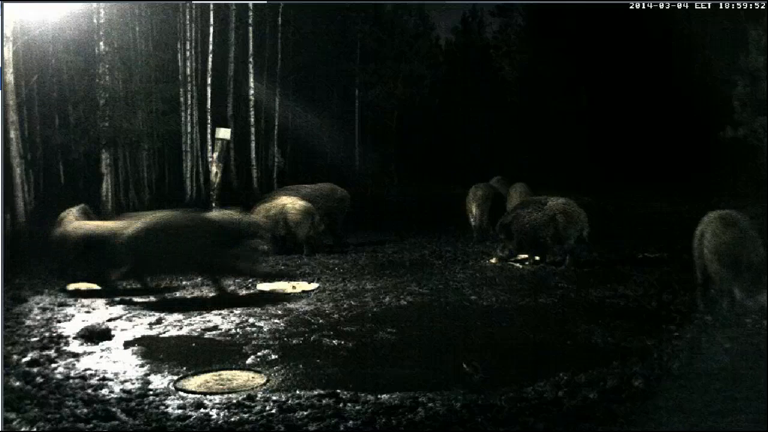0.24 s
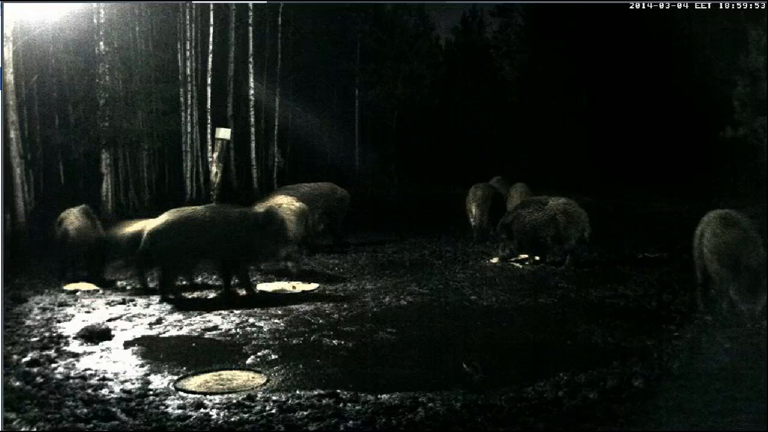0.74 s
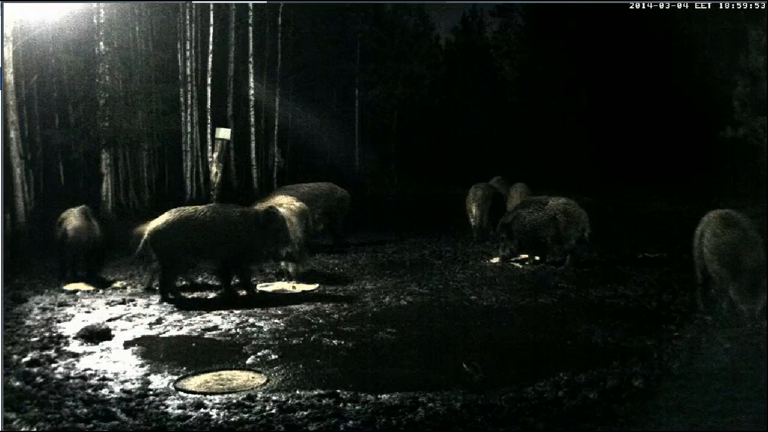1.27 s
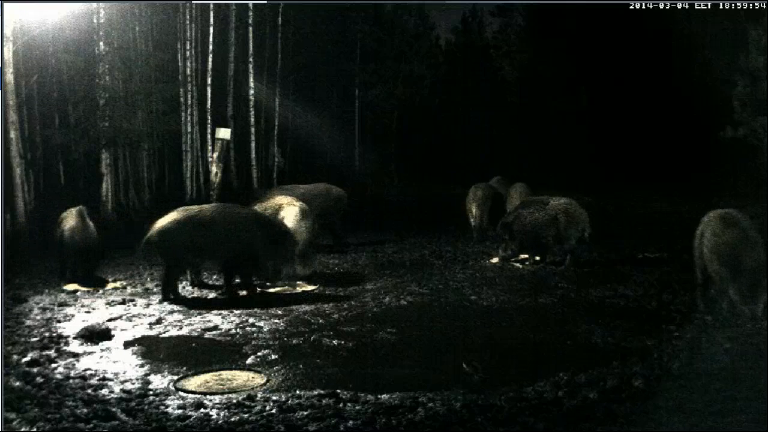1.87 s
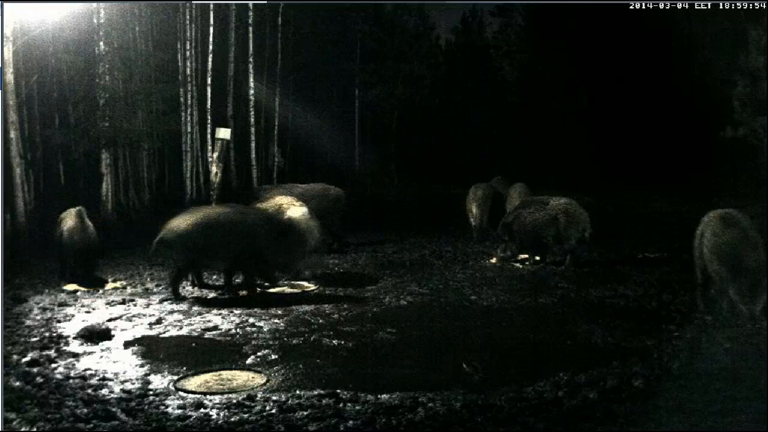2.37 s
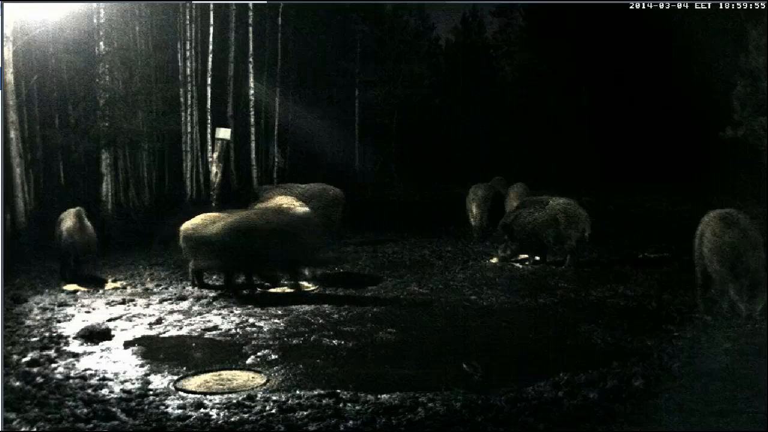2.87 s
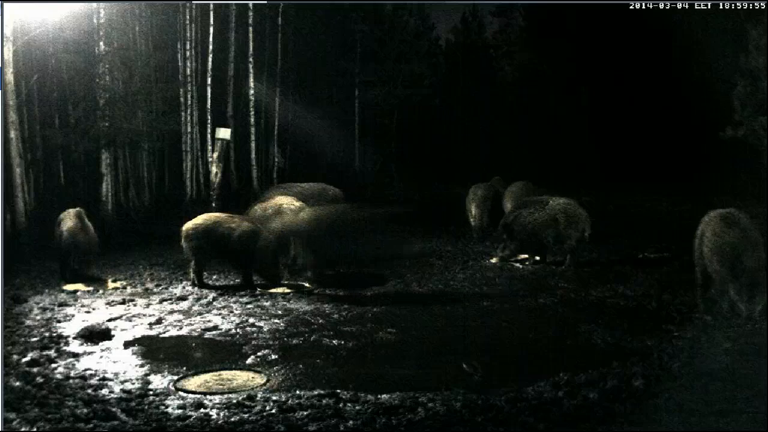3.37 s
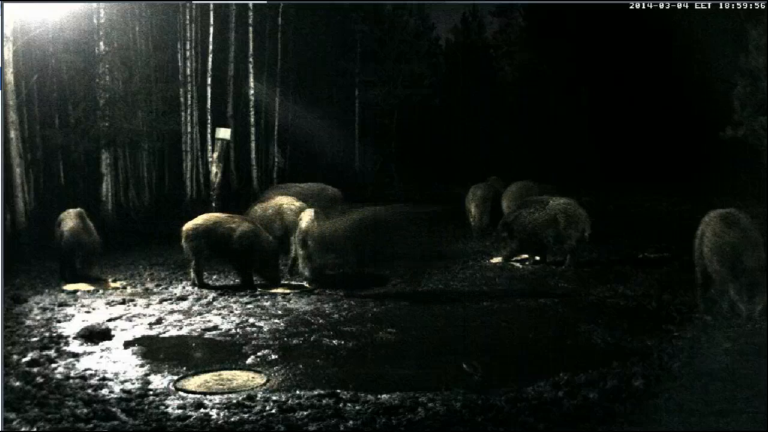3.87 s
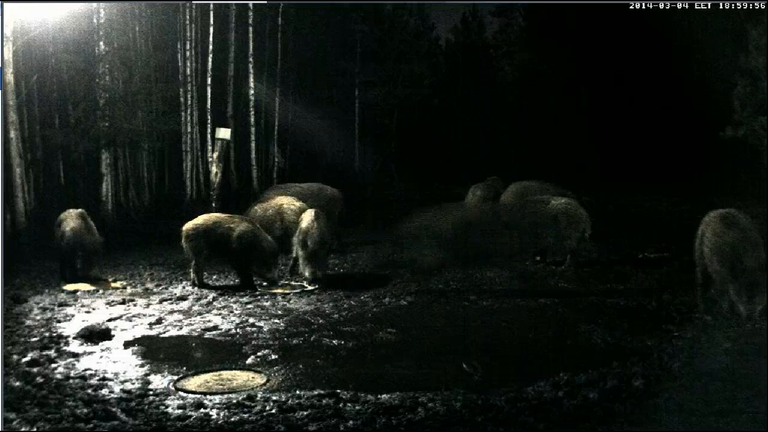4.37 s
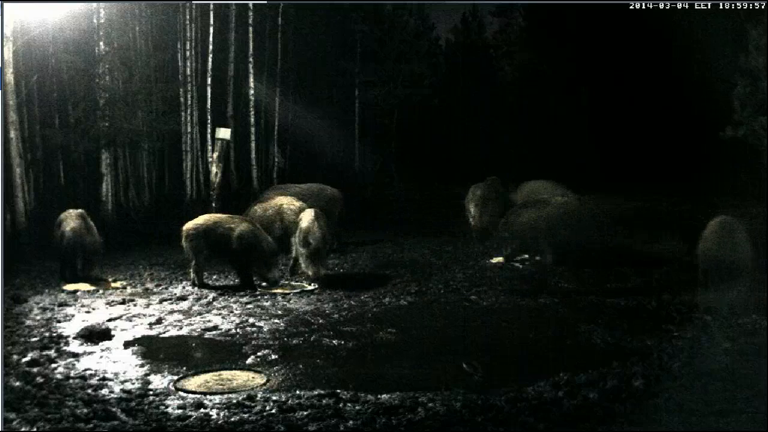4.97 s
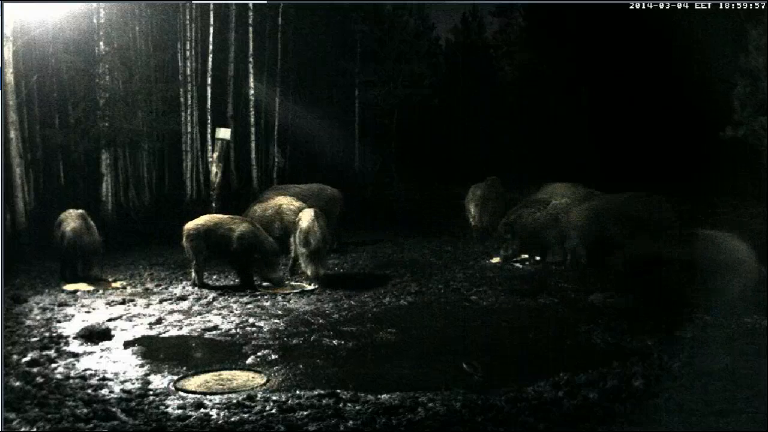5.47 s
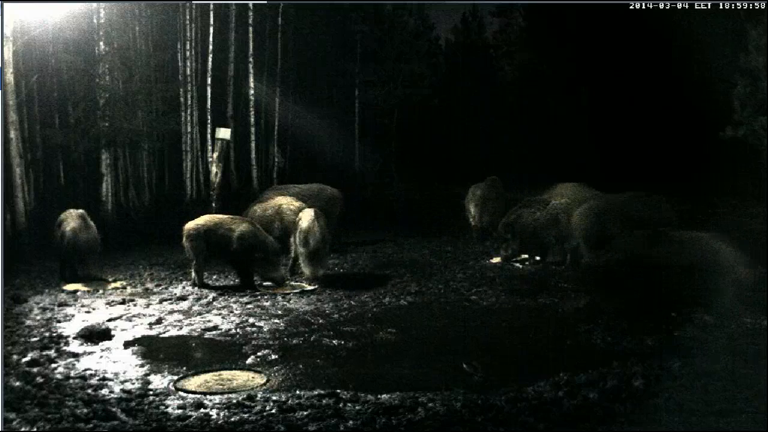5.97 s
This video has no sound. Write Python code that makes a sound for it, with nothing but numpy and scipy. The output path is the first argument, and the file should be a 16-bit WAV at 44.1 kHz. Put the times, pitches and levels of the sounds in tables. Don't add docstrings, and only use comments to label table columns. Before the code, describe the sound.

A herd of wild boar feeds on wet ground at a forest edge at night. Dense irregular crunching, husk cracks, sharp kernel snaps and tiny clicks run throughout over constant jaw grinding. A distant engine hums low and steady, sinking slightly. Soft mud thumps and wet smacks come between, and near the end one animal gives a quick low grunt. The narrow-band microphone sounds boxy and slightly gritty.

```python
import sys
import numpy as np
from scipy import signal
from scipy.fft import rfft, irfft
from scipy.io import wavfile
from scipy.ndimage import uniform_filter1d

SR = 44100
rng = np.random.default_rng(int(sys.argv[2]) if len(sys.argv) > 2 else 0)


def magnitude_from_level(level_db):
    exponent = np.asarray(level_db, float) / 20
    return 10 ** exponent


def store_pcm(level_fs):
    pcm = np.round(np.clip(level_fs, -1, 1) * 32767).astype(np.int16)
    wavfile.write(sys.argv[1], SR, np.atleast_2d(pcm).T)


N = 274302


def in_time(rows):
    s, *columns = np.transpose(rows)
    return [np.interp(np.arange(N) / SR, s, c) for c in columns]


def rms_one(x):
    return x / np.sqrt(np.mean(x ** 2) + 1e-20)


def highpass(x, order, hz):
    return signal.sosfilt(signal.butter(order, hz, "high", fs=SR, output="sos"), x)


def drift(rate):
    r = np.exp(-80 * np.pi * rate / SR)
    noise = rng.standard_normal(N // 40 + 2002)
    slow = signal.lfilter([1], [1, -2 * r, r * r], noise)[2000:]
    return np.interp(np.arange(N) / 40, np.arange(len(slow)), rms_one(slow))


def ring(clicks, hz, t60):
    r, w = magnitude_from_level(-60 / (t60 * SR)), 2 * np.pi * hz / SR
    return signal.lfilter([0, np.sin(w)], [1, -2 * r * np.cos(w), r * r], clicks + 1e-18)


def grains(shape, per_s, spread_db):
    born = rng.random(shape) < per_s / SR
    sizes = magnitude_from_level(spread_db * np.minimum(rng.exponential(1, shape), 3.3))
    return born * sizes * rng.choice([-1, 1], shape)


def coloured(spectrum):
    hz, level_db = np.transpose(spectrum)
    grid = np.arange(N // 2 + 1) * SR / N + 1
    gain = magnitude_from_level(np.interp(np.log(grid), np.log(hz), level_db))
    return rms_one(irfft(rfft(rng.standard_normal(N)) * gain, N))


def add(out, s, piece):
    at = max(round(s * SR), 0)
    out[at:at + len(piece)] += piece[:N - at]


def knock(s, peak_db, hz, cycles):
    t60 = np.clip(cycles, 1, 45) / hz
    pulse = np.arange(round(2 * t60 * SR)) == 0
    for share in (1, 0.4, 0.4):
        pulse = ring(pulse, hz, share * t60)
    return s - np.abs(pulse).argmax() / SR, magnitude_from_level(peak_db) * pulse / np.abs(pulse).max()


def knocks(rows):
    out = np.zeros(N)
    for row in rows:
        add(out, *knock(*row))
    return out


def pushes(rows):
    out = np.zeros(N)
    for s, peak_db, hz, cycles in rows:
        t60 = np.clip(cycles, 1, 45) / hz
        pulse = np.arange(round(2 * t60 * SR)) == 0
        pulse = ring(ring(pulse, hz, t60), hz, 0.12 * t60)
        add(out, s - 0.81 / hz, magnitude_from_level(peak_db) * pulse / np.abs(pulse).max())
    return out


def fractures(rows, size=500):
    out, t = np.zeros(N), np.arange(size) / SR
    for s, peak_db, hz, tick_db, cycles in rows:
        add(out, *knock(s, peak_db, hz, cycles))
        add(out, *knock(s, peak_db + tick_db + 0.5, 3350, 16.0))
        add(out, *knock(s - 0.00046, peak_db - 9.5, 2600, 6.0))
        bits = grains(size, per_s=3800, spread_db=5.0)
        splinter = rms_one(ring(bits, hz, 3.0 / hz)) * np.exp(-t / 0.0012)
        add(out, s, magnitude_from_level(peak_db - 15.0) * splinter)
    return out


def engine():
    # t/s, level/dB
    tone_level = [(0.0, -62), (1.0, -58), (1.19, -52), (1.61, -58.5), (1.9, -56.5), (1.97, -56),
                  (2.05, -53), (2.27, -53.5), (3.59, -54), (3.72, -57.5), (4.31, -50.5), (4.66, -53),
                  (4.87, -57), (5.33, -56), (5.51, -55), (6.06, -51), (6.22, -56)]
    # t/s, depth/dB, width/s
    half_fades = [(.55, 5.5, 0.1), (1.1, 3, 0.5), (1.9, 6, 0.42), (5.5, 4.5, 0.82)]
    # f/Hz, level/dB per Hz
    rumble_colour = [(100, -36.5), (128, -14.5), (148, -2), (200, 3), (260, -4), (340, -3.5), (440, -10),
                     (525, -14), (640, -17), (900, -17), (1500, -33.5)]
    blade_hz, sag_hz_per_s = 239.9, 2.31
    t, (tone_db,) = np.arange(N) / SR, in_time(tone_level)
    phase = 2 * np.pi * np.cumsum(blade_hz - sag_hz_per_s * t) / SR
    half_db = -64.5 - sum(depth_db * np.exp(-((t - s) / width) ** 2) for s, depth_db, width in half_fades)
    tone = magnitude_from_level(tone_db + 3 + 0.6 * drift(7)) * np.sin(phase + .12 * drift(3))
    half = magnitude_from_level(half_db + 3 + 1.8 * drift(4)) * np.sin(phase / 2)
    double = magnitude_from_level(tone_db - 16.5 + 3.0 * drift(6)) * np.sin(2 * phase + .8 * drift(5))
    rumble_db = -55.5 + 0.2 * (tone_db - tone_db.mean())
    rumble = magnitude_from_level(rumble_db + 1.37 * drift(15)) * coloured(rumble_colour)
    return tone + half + double + rumble


def grinding():
    # t/s, level/dB, dryness/dB (shifts weight from the dull to the bright part)
    herd = [(0.0, -61, -0.5), (0.31, -57.5, 1.5), (1.3, -60.5, 0), (2.27, -63.5, -1.5), (2.65, -59.5, -0.2),
            (3.27, -58.5, 2.5), (4.09, -56.5, -1), (4.68, -57.5, 0), (4.9, -55, 9), (5.44, -57, -1),
            (5.7, -59.5, 1), (6.22, -57.5, 0.5)]
    jaw, (herd_db, dry_db) = drift(32), in_time(herd)
    parts = [(herd_db, 1450, 2530),
             (herd_db - 7 - 3.8 * dry_db, 855, 1310),
             (herd_db - 0.5 + 0.16 * dry_db, 3530, 3580)]
    out = np.zeros(N)
    for level_db, low_hz, high_hz in parts:
        clicks, dealt = grains(N, per_s=2000, spread_db=2.5), rng.integers(0, 8, N)
        pitches = np.geomspace(low_hz, high_hz, 8)
        part = sum(ring(clicks * (dealt == k), hz, 9.5 / hz) for k, hz in enumerate(pitches))
        out += magnitude_from_level(level_db + 2.43 * jaw + 1.1 * drift(38)) * rms_one(part)
    return out


def crunches(size=9000):
    # t/s of peak, body level/dB, mouth f/Hz, bright level/dB
    cracks = [(.17, -42, 2420, -44), (0.458, -67, 2570, -48), (.618, -48, 2560, -46),
              (1.009, -57, 920, -79), (2.164, -44, 870, -52.5), (2.543, -40, 1730, -44),
              (2.742, -44, 1730, -50), (2.935, -44, 1290, -53), (2.975, -40.5, 1000, -50),
              (3.321, -48, 1200, -56), (3.413, -45, 920, -75), (3.543, -48, 1790, -49),
              (3.69, -43, 1790, -45), (4.139, -42, 1280, -53), (4.343, -38.5, 980, -48),
              (5.023, -56, 2060, -47), (5.07, -38, 2530, -51), (5.109, -43, 1750, -59),
              (5.277, -37.5, 1610, -45), (5.501, -41, 1100, -49), (5.536, -48, 1030, -41.5),
              (5.794, -45, 1320, -75), (5.949, -38.5, 1020, -43), (6.138, -58, 1940, -40),
              (.915, -39, 2060, -58), (5.156, -42.5, 2900, -57), (5.212, -59, 3300, -49)]
    chews = [(.008, -49, 2330, -45.5), (.31, -43.5, 2230, -73), (0.727, -46, 2400, -47),
             (1.345, -57, 1670, -65), (1.369, -51, 1540, -56), (1.457, -46, 1670, -61),
             (1.53, -44, 1240, -75), (1.715, -49, 1350, -51.5), (1.805, -41, 1490, -54),
             (2.782, -65, 2280, -55), (3.19, -38.5, 2100, -39), (3.353, -38.5, 1750, -47.5),
             (3.463, -46.5, 1670, -74), (3.505, -46.5, 1090, -76), (3.747, -39, 1260, -40.5),
             (3.767, -43, 1740, -53), (3.944, -39.5, 1640, -51), (4.434, -47.5, 1520, -48),
             (4.531, -38, 1840, -48.5), (4.721, -44, 1710, -54), (4.915, -42.5, 1700, -48),
             (5.298, -55, 1970, -50), (5.318, -41.5, 1740, -52), (5.613, -38, 1800, -44)]
    bites = [(0.287, -53, 1750, -60), (.361, -46, 1120, -52), (.428, -52, 2580, -48),
             (.897, -46, 880, -42.5), (1.07, -49, 1520, -53), (1.127, -41.5, 1720, -56),
             (1.181, -36, 1820, -46), (1.419, -43, 1800, -54), (1.64, -41.5, 1740, -55.5),
             (2.421, -47.5, 2340, -56), (3.593, -43, 1760, -46), (4.002, -46, 1930, -47.5),
             (4.479, -46, 2110, -51), (4.77, -44, 2080, -43), (4.8, -35.5, 2480, -51),
             (4.892, -54, 2900, -51), (4.936, -58, 3260, -47.5), (5.468, -49, 2400, -54),
             (5.19, -41.5, 1820, -59)]
    drags = [(.25, -52, 2040, -52), (.508, -71, 1680, -53.5), (.82, -49.5, 1700, -53),
             (1.857, -46.5, 1500, -53), (1.9, -47, 970, -57), (2.024, -45.5, 1430, -85),
             (2.359, -51, 1760, -54), (2.485, -52, 1820, -54), (2.608, -50, 930, -64),
             (2.831, -48.5, 1980, -50), (4.09, -52, 1530, -52.5), (4.161, -44, 1330, -50),
             (4.264, -49.5, 1640, -60)]
    # swell/s, fade/s
    closings = [
        (0.0082, 0.0054),
        (0.014, 0.0098),
        (0.0074, 0.013),
        (0.021, 0.023),
    ]
    out, t = np.zeros(N), np.arange(size) / SR - .08
    rows = [(*row, *closing) for kind, closing in zip((cracks, chews, bites, drags), closings) for row in kind]
    for s, body_db, hz, bright_db, swell, fade in rows:
        a, b, c = grains((3, size), per_s=2200, spread_db=3.0)
        rise = np.exp(-.7 * (np.minimum(t, 0) / max(swell, .002)) ** 2)
        shape = rise * np.exp(-.46 * (np.maximum(t, 0) / max(fade, .003)) ** 0.97)
        body = 0.5 * rms_one(ring(a, hz, 14.2 / hz)) + 0.36 * rms_one(ring(b, 1820, 0.005))
        bright = rms_one(ring(c, 3477, 0.0043))
        piece = shape * (magnitude_from_level(body_db) * body + magnitude_from_level(bright_db) * bright)
        before_start = max(round((-s - t[0]) * SR), 0)
        add(out, s + t[0], piece[before_start:])
    return out


def husks():
    # t/s of peak, level/dB, mouth f/Hz
    cracked = [(.009, -37.5, 3150), (0.4557, -32, 3270), (0.461, -31.5, 3310), (0.6133, -35.5, 3500),
               (0.898, -41, 3240), (1.7138, -36, 2950), (1.783, -40.5, 3340), (1.061, -44.5, 3350),
               (2.5034, -37.5, 3350), (3.252, -42, 2670), (2.8884, -36.5, 3450), (2.999, -34.5, 3505),
               (3.5877, -39, 2990), (3.608, -39, 2630), (3.708, -36, 2810), (3.7435, -29, 3360),
               (4.211, -38.5, 3290), (4.796, -32, 3350), (5.071, -37.5, 3150), (5.263, -37, 3030),
               (5.498, -33.5, 2840), (5.503, -31, 3440), (5.5314, -28.5, 3340), (5.6754, -46, 2480),
               (6.1343, -34.5, 2830), (6.1887, -38.5, 3350)]
    return fractures([(*row, -30, 21.0) for row in cracked])


def trunks(x):
    t = np.arange(round(.2 * SR)) / SR
    haze = rms_one(grains(len(t), per_s=4200, spread_db=-0.5)) * magnitude_from_level(-60 * t / 0.28) * (t > .006)
    return signal.fftconvolve(x, haze)[:N]


def splinters():
    # t/s of peak, level/dB, mouth f/Hz
    deep = [(0.0507, -48, 1370), (0.0582, -51, 1050), (0.1712, -54, 1430), (0.3074, -53.0, 1100),
            (0.3144, -48, 1250), (0.3663, -58, 1100), (0.4269, -49, 1220), (0.4553, -56, 1310),
            (0.6162, -52, 1310), (0.691, -52, 1310), (0.7082, -46.5, 1150), (0.7861, -52, 1370),
            (0.8986, -45, 920), (1.2064, -54, 930), (1.2243, -43, 1140), (1.232, -54, 1370),
            (1.3198, -50, 950), (1.4378, -51, 1420), (1.463, -48, 1020), (1.4852, -55.0, 1060),
            (1.8511, -50, 1020), (1.8586, -45, 840), (1.8659, -48, 1430), (1.8823, -49, 1430),
            (2.02, -43, 1490), (2.025, -49, 885), (2.1657, -47, 1370), (2.1744, -49, 1260),
            (2.3547, -46.5, 1140), (2.5296, -53.0, 1310), (2.6079, -54, 930), (2.7384, -52, 1490),
            (2.8808, -54.0, 1310), (2.9347, -47.0, 1270), (3.0841, -49, 1490), (3.2028, -48, 1200),
            (3.2377, -49, 1010), (3.3211, -42.5, 1200), (3.4273, -46, 1200), (3.4395, -46, 1190),
            (3.5026, -43, 1150), (3.6079, -46, 1370), (3.7566, -36, 1260), (3.9456, -44, 1040),
            (4.1594, -40, 1310), (4.2115, -54, 1310), (4.2527, -48, 1260), (4.3889, -53.0, 1370),
            (4.3974, -55, 1150), (4.4984, -47, 855), (4.5999, -53.0, 1140), (4.6732, -48, 1200),
            (4.6807, -54.0, 1150), (4.6939, -52.0, 1490), (4.7174, -48, 1100), (5.2734, -37.5, 1320),
            (5.3188, -43, 1150), (5.5318, -45, 1070)]
    middle = [(0.2864, -45, 1700), (0.3249, -45, 1850), (0.375, -44, 2190), (0.4418, -38, 2390),
              (0.7322, -48.0, 2390), (0.903, -43, 1690), (1.1452, -42, 1770), (1.1904, -41, 2230),
              (1.4196, -42, 1790), (1.6281, -39.5, 1780), (1.6376, -33, 1770), (1.7743, -45, 1770),
              (2.358, -50.0, 1770), (2.4169, -47, 2290), (2.5032, -42, 1590), (2.5588, -40.5, 1770),
              (2.5795, -43, 1760), (2.6154, -44, 1620), (2.6324, -45, 1560), (2.8893, -43, 1770),
              (3.1612, -46, 1560), (3.1931, -41, 1850), (3.2008, -52, 1770), (3.3652, -51, 1700),
              (3.4622, -43, 1700), (3.5401, -45, 1770), (3.5954, -50, 1850), (3.6149, -45, 2600),
              (3.685, -46, 1770), (3.7331, -43.0, 2100), (3.7493, -30.5, 1950), (3.7581, -33, 1900),
              (3.772, -49, 1620), (4.0399, -42, 1560), (4.0993, -41.5, 2390), (4.1706, -41, 2050),
              (4.338, -45, 1560), (4.4168, -45, 2100), (4.4225, -51, 2190), (4.4507, -44, 2500),
              (4.5201, -42, 1620), (4.5276, -23.5, 1830), (4.5388, -41.0, 1930), (4.5445, -43, 1770),
              (4.5552, -46.0, 2010), (4.5842, -42, 2290), (4.7121, -49.0, 2490), (4.7752, -35, 2390),
              (4.784, -35, 2290), (4.8114, -36, 2390), (4.896, -43, 2190), (5.0853, -44, 2270),
              (5.2207, -45, 2100), (5.2961, -36, 1860), (5.3205, -39, 1710), (5.4689, -39, 2400),
              (5.5959, -46, 1710), (5.6493, -45, 1620)]
    front = [(0.1697, -39, 3300), (0.282, -37.5, 3390), (0.3269, -39.5, 3520), (0.3852, -42, 3520),
             (0.467, -47, 2720), (0.5666, -48.0, 3240), (0.6933, -42, 3500), (0.7299, -38, 3520),
             (0.7359, -38.5, 3385), (0.835, -41.5, 3135), (0.8898, -33, 3380), (0.9025, -38, 3405),
             (0.9397, -49, 3320), (1.4219, -40.5, 3540), (1.6693, -43.5, 2960), (1.7658, -44, 3430),
             (1.926, -47.0, 3340), (2.1125, -46, 3480), (2.5116, -41, 3370), (2.5418, -44, 3355),
             (2.5815, -44, 3520), (2.7494, -44, 3220), (3.0232, -42, 3520), (3.1213, -51.0, 3090),
             (3.1285, -50, 3250), (3.1662, -39, 3176), (3.2021, -37, 3520), (3.3131, -45, 2900),
             (3.5406, -43, 3520), (3.5937, -36.5, 3100), (3.6144, -44, 3370), (3.683, -41, 3230),
             (3.6862, -42, 3520), (3.7586, -40, 2860), (3.8097, -43, 3260), (4.0866, -48.0, 3070),
             (4.1135, -45, 3070), (4.1464, -50, 3360), (4.1711, -47, 2840), (4.1851, -50, 3350),
             (4.2063, -41, 3520), (4.3352, -41, 3380), (4.4238, -41, 3390), (4.4512, -38.5, 3350),
             (4.5031, -43, 3370), (4.7261, -46, 2960), (4.768, -36, 3340), (4.8189, -38, 2930),
             (4.893, -40, 3360), (5.086, -41, 3380), (5.1963, -42, 2780), (5.212, -35, 3390),
             (5.2734, -36, 3386), (5.3193, -45, 2840), (5.3257, -45, 2840), (5.9174, -44, 3220),
             (5.9426, -40, 2830), (5.988, -41, 3380)]
    places = (deep, 13.3), (middle, 13.0), (front, 19)
    return fractures([(*row, -30, cycles) for bits, cycles in places for row in bits])


def thumps():
    # t/s of peak, level/dB, f/Hz
    mud = [(.172, -43, 380), (1.011, -43, 308), (1.178, -33, 290), (1.829, -38.5, 292), (1.858, -42.5, 352),
           (1.875, -38, 310), (1.91, -41, 470), (2.167, -44, 590), (2.75, -40.5, 338), (2.764, -45, 302),
           (3.757, -34.5, 386), (2.256, -46, 180), (4.766, -38.5, 336), (5.531, -38.5, 560),
           (5.95, -48, 375)]
    return pushes([(*row, 5.3) for row in mud])


def snaps():
    # t/s of peak, level/dB, mouth f/Hz, bright tick level/dB re snap
    kernels = [(0.2896, -42, 1810, -6), (.425, -32, 2470, -21), (.834, -34.5, 2100, -7),
               (1.1782, -27, 1880, -7), (1.224, -38, 1520, -13), (1.344, -41.5, 1690, -8),
               (2.543, -36.5, 1930, -12), (3.1677, -32.5, 1770, -10), (3.1827, -31, 2400, -9),
               (3.355, -32.5, 1800, -11), (3.683, -38.5, 1160, -2), (3.488, -37, 1590, -15),
               (3.7031, -30.5, 1900, -4), (3.7658, -31.5, 1840, -2), (3.948, -45, 1690, -14),
               (3.9536, -39, 1750, -17), (4.0, -36, 1900, -1), (4.026, -38.5, 2400, -5),
               (4.191, -37, 1840, -17), (4.511, -31.5, 1800, -5.5), (4.6656, -35.5, 2240, -18),
               (4.765, -18, 2020, -39), (4.7746, -33, 1970, -18), (4.911, -34, 2410, -18),
               (5.018, -31, 2040, -20), (5.1048, -34.5, 2180, -17), (5.185, -34.5, 2400, -15)]
    return fractures([(*row, 9.52) for row in kernels])


def twigs():
    # t/s of peak, level/dB
    snapped = [(.701, -41), (1.041, -41), (5.6752, -35), (5.7812, -45), (5.9004, -34.5), (6.086, -42),
               (6.097, -42), (6.134, -36)]
    return knocks([(*row, 2900, 4.0) for row in snapped])


def top_ticks():
    # t/s of peak, level/dB, f/Hz
    ticks = [(.9395, -41, 3800), (1.2751, -47, 3600), (1.3614, -43, 3800), (1.4617, -42, 3800),
             (2.6605, -42, 3680), (3.1665, -39, 3850), (3.6457, -40, 3650), (3.6828, -32.5, 3900),
             (3.7435, -38, 3820), (4.5275, -47, 3700), (4.7965, -41, 3860), (4.8925, -43, 3800),
             (4.9355, -36, 3850), (5.0205, -38, 3800), (5.1865, -40, 3800)]
    return knocks([(*row, 16.0) for row in ticks])


def pops():
    # t/s of peak, level/dB, mouth f/Hz
    burst = [(1.009, -37, 1010), (1.2533, -42, 1200), (2.1633, -38.5, 930), (2.973, -35.5, 1090),
             (3.412, -35.5, 920), (3.4613, -37, 1660), (3.7483, -29, 1350), (4.106, -37.5, 1440),
             (4.132, -40, 2200), (4.3446, -38, 1060), (4.695, -45, 1190), (5.2723, -28, 2340),
             (1.365, -45, 1600), (5.9013, -38, 1000), (5.952, -33, 1530)]
    return fractures([(*row, -16, 7.4) for row in burst])


def smacks():
    # t/s of peak, level/dB, f/Hz, ringing/cycles
    lips = [(1.178, -33, 1170, 18), (1.527, -43, 1300, 35), (1.88, -46, 860, 7), (3.4095, -36, 900, 15.5),
            (1.533, -46, 1290, 28), (1.646, -43, 1300, 16), (4.1355, -35.5, 1290, 38),
            (4.9111, -34.5, 1660, 26), (5.615, -44, 880, 27), (5.4971, -39, 1118, 53),
            (5.529, -44, 1630, 30), (5.5398, -46, 1110, 37), (5.791, -41, 1310, 34)]
    return pushes(lips)


def grunt():
    # t/s of peak, level/dB, f/Hz
    throat = [(5.4678, -34, 227), (5.4977, -28.5, 263), (5.511, -35, 246), (5.531, -40, 263),
              (5.543, -40, 210)]
    return pushes([(*row, 5.8) for row in throat])


def scene():
    near = husks() + splinters() + snaps() + twigs() + top_ticks() + pops()
    chewing = near + magnitude_from_level(-38.5) * trunks(near) + magnitude_from_level(-2) * crunches() + grinding()
    soft = highpass(thumps() + smacks() + grunt(), 8, 140)
    return (highpass(chewing, 3, 777) + soft + engine())[None]


def top_cut(x):
    return signal.sosfilt(signal.butter(12, 15750, fs=SR, output="sos"), x)


def record(dry):
    # f/Hz, level/dB per Hz
    hiss_colour = [(30, 16.5), (90, 21.5), (300, 0.5), (4500, -1.5), (6000, -3), (9000, 0.5), (10500, -1.5),
                   (12000, 1.5), (15700, -2)]
    sampling_hz, back_off_db, back_off_s = 8000, 4, 0.025
    since = (np.arange(N) - np.abs(dry).argmax()) / SR
    gain = magnitude_from_level(-back_off_db * np.clip(since / back_off_s, 0, 1))
    x = highpass(gain * dry, 6, 79.4)
    x = signal.sosfilt(signal.butter(9, 3406, fs=SR, output="sos"), x)
    carrier = np.cos(2 * np.pi * sampling_hz * np.arange(N) / SR)
    x = x + magnitude_from_level(-21.0) * highpass(x * carrier, 4, 4050)
    x = signal.sosfilt(signal.ellip(6, .5, 45, 4350, fs=SR, output="sos"), x)
    treble = highpass(x, 4, 2800)
    bent = highpass(magnitude_from_level(-26) * x ** 2 + magnitude_from_level(-30) * np.abs(treble), 8, 5600)
    bent = bent + magnitude_from_level(11) * highpass(np.abs(bent), 6, 10800)
    loudness = uniform_filter1d(np.abs(x), size=44, axis=-1)
    hiss = (gain * magnitude_from_level(-84) + magnitude_from_level(-39.5) * loudness) * coloured(hiss_colour)
    x = signal.sosfilt(signal.ellip(10, .5, 40, 15740, fs=SR, output="sos"), x + bent + hiss)
    return top_cut(x)


dry = scene()
out = record(dry)
store_pcm(out)
```